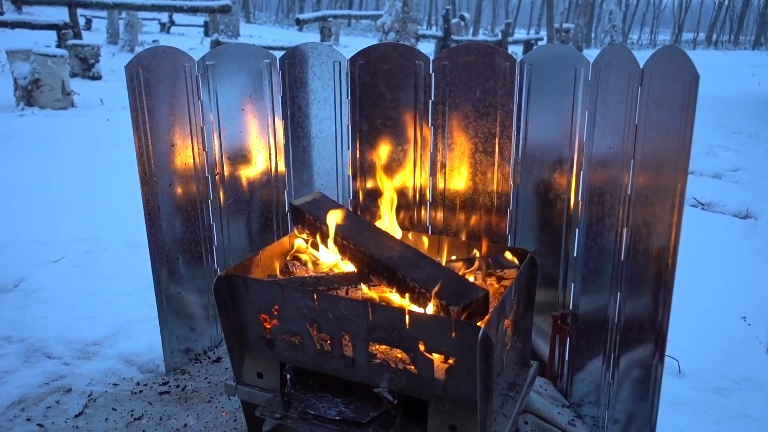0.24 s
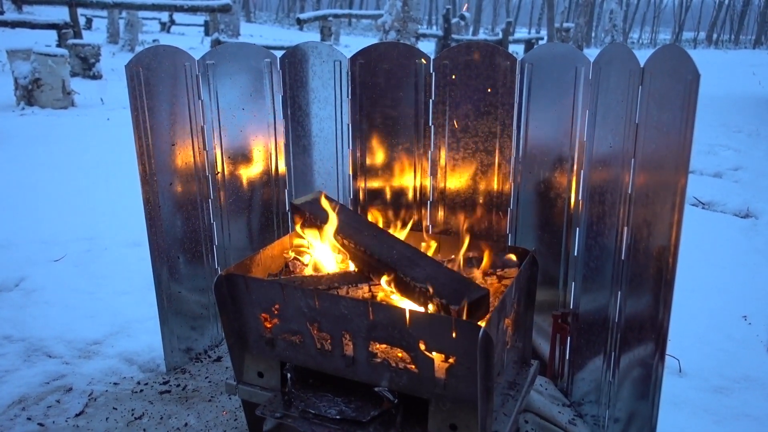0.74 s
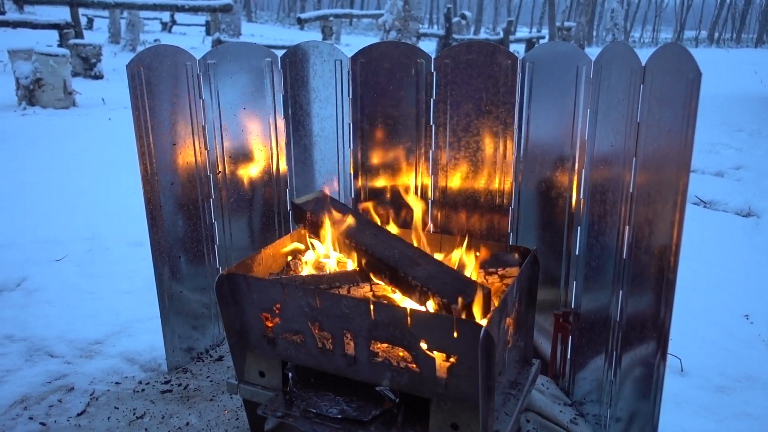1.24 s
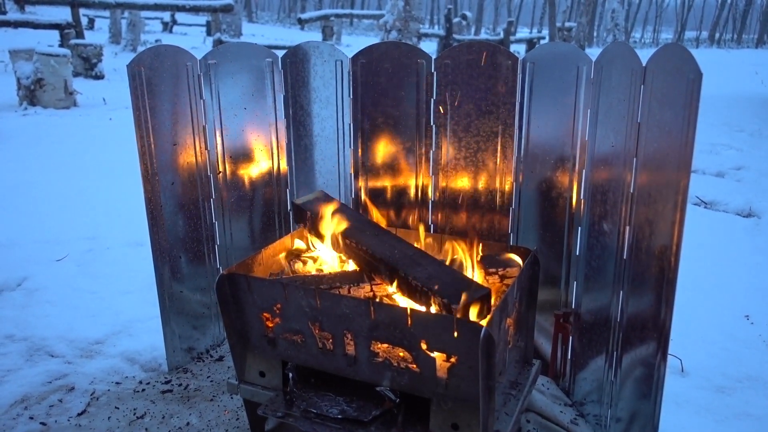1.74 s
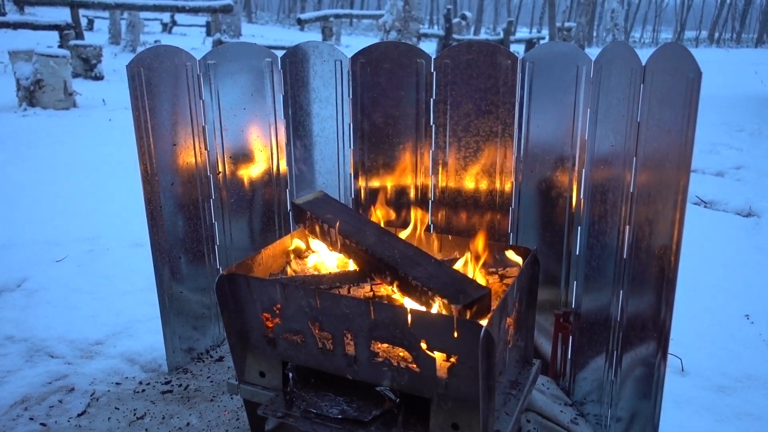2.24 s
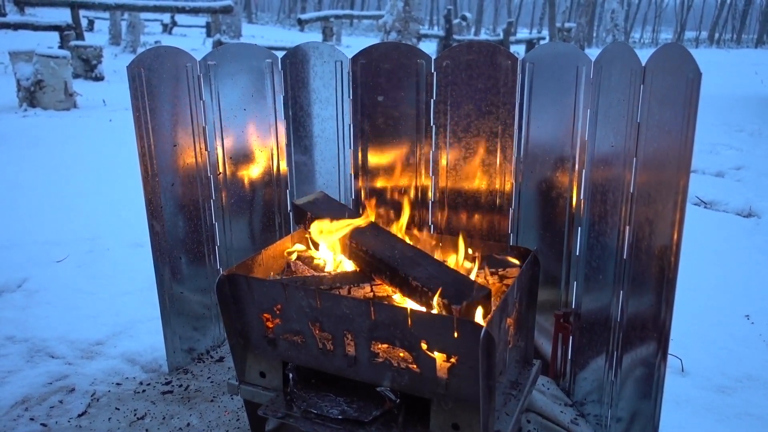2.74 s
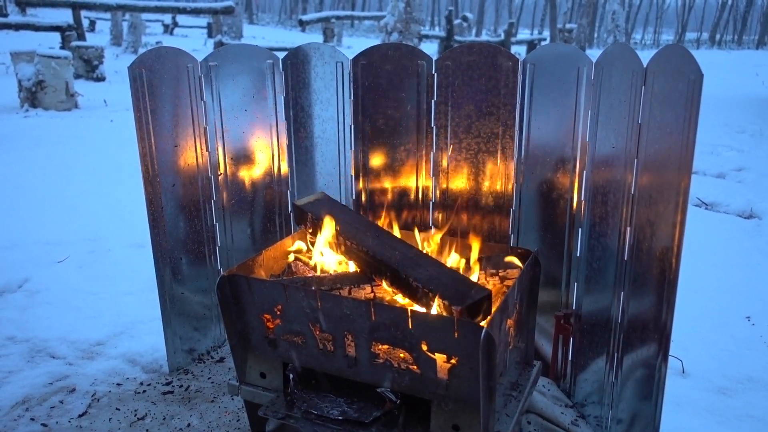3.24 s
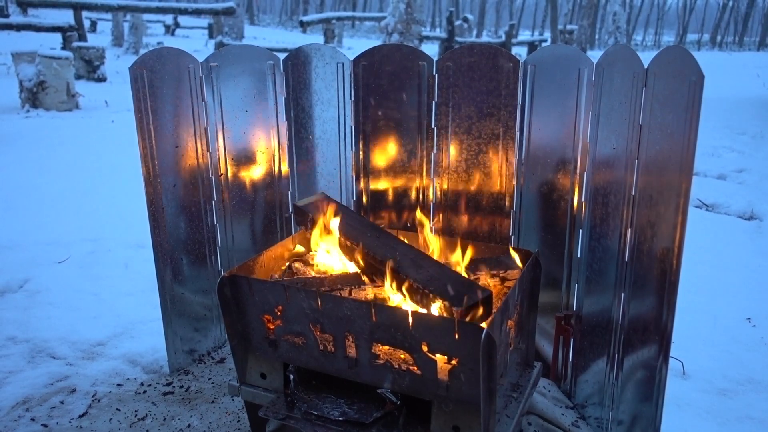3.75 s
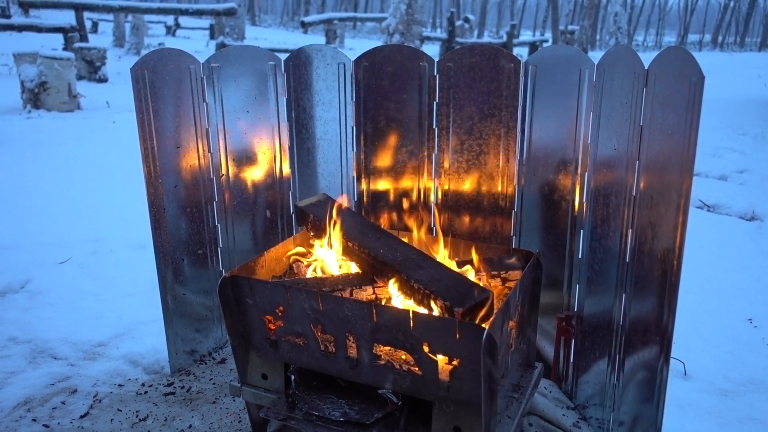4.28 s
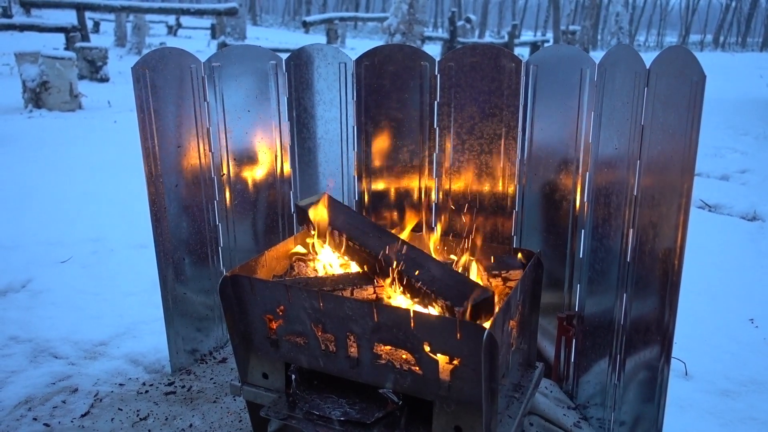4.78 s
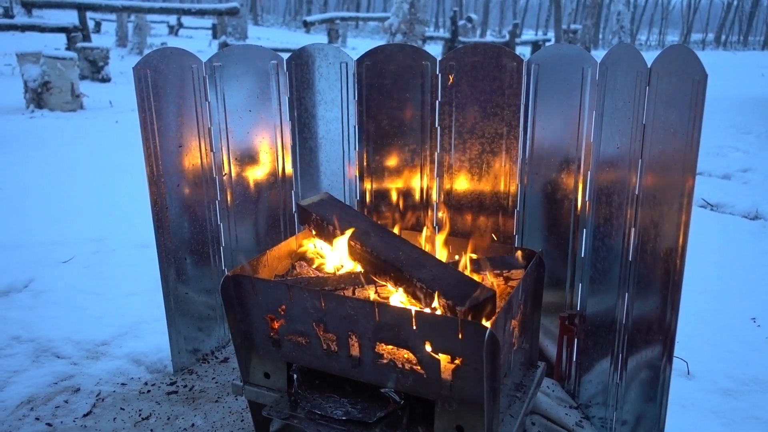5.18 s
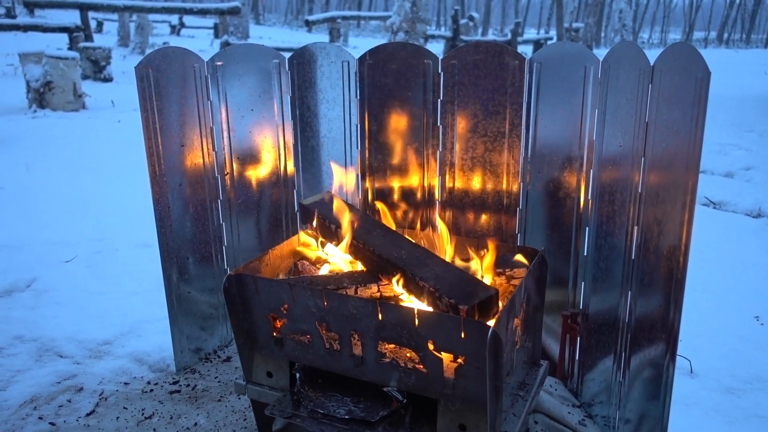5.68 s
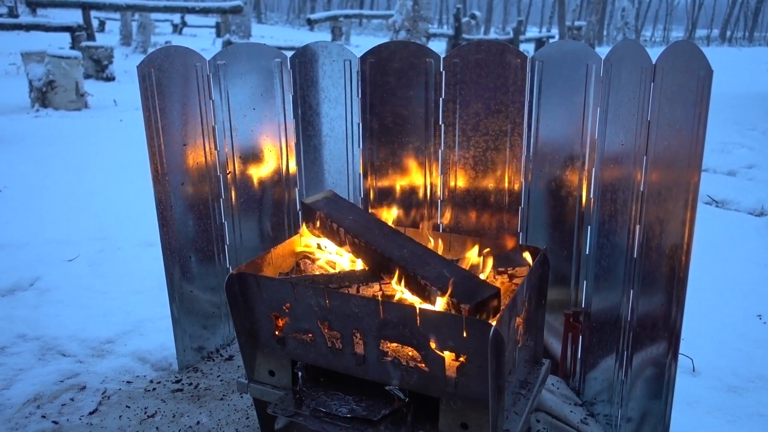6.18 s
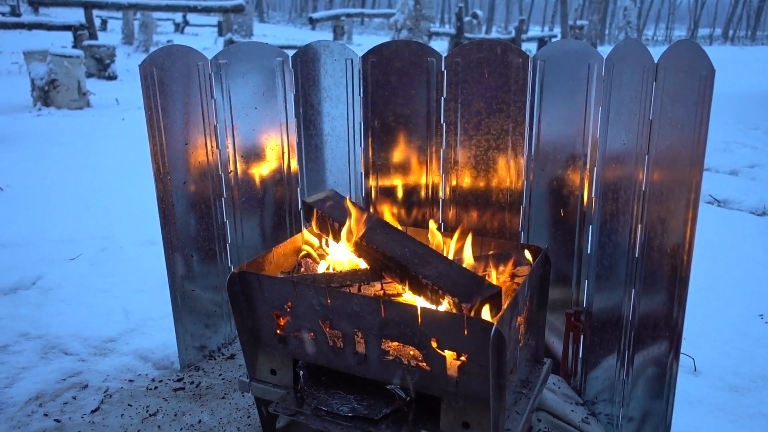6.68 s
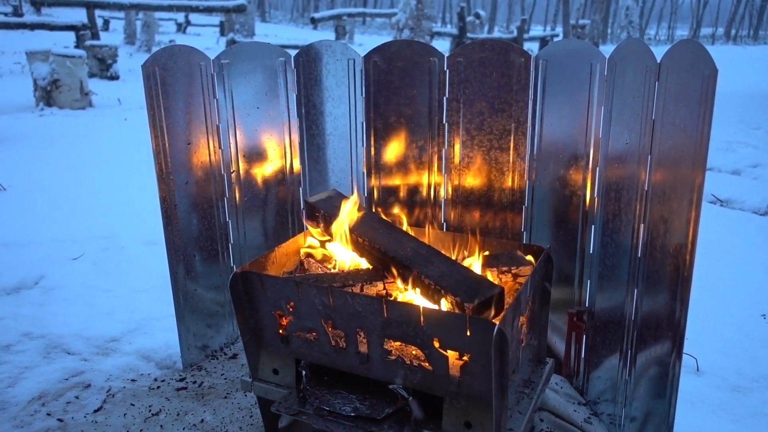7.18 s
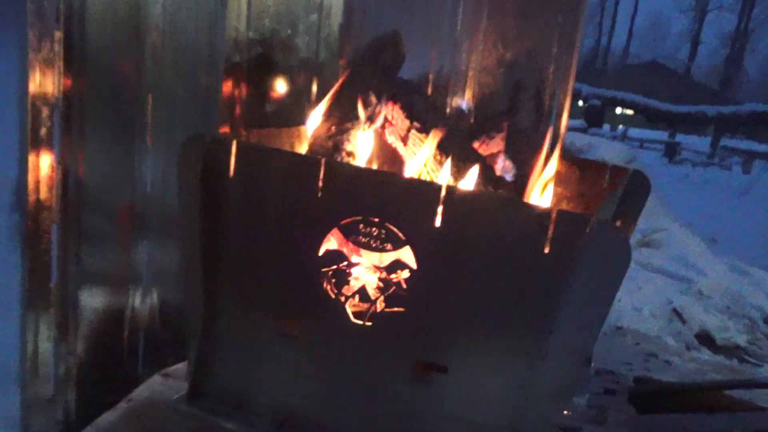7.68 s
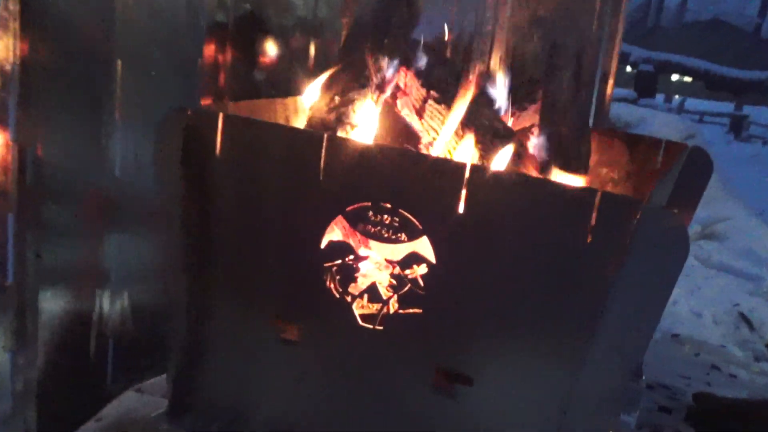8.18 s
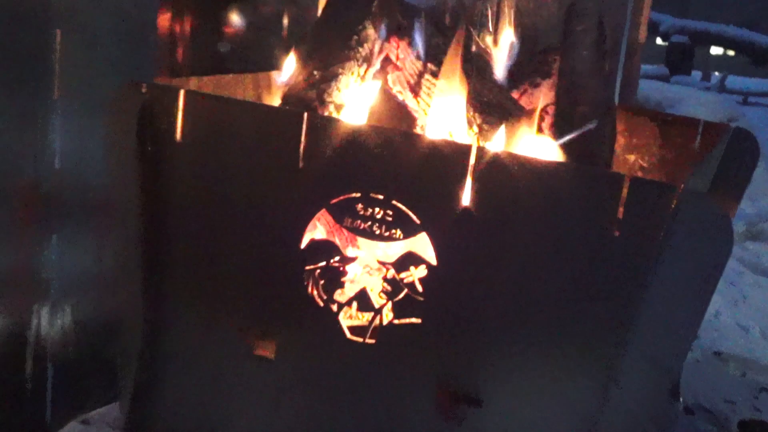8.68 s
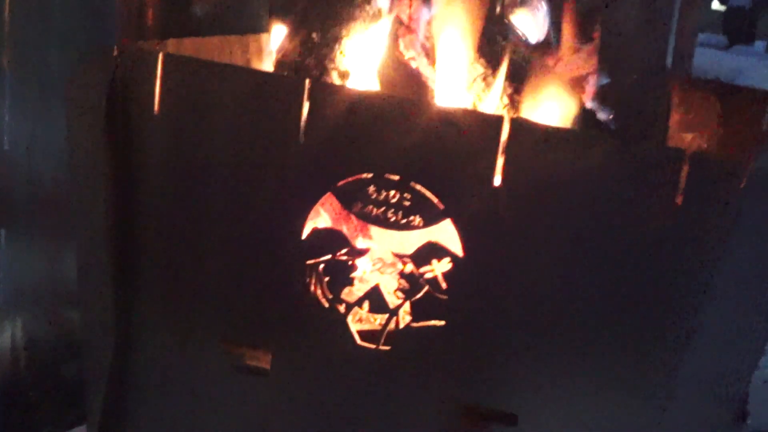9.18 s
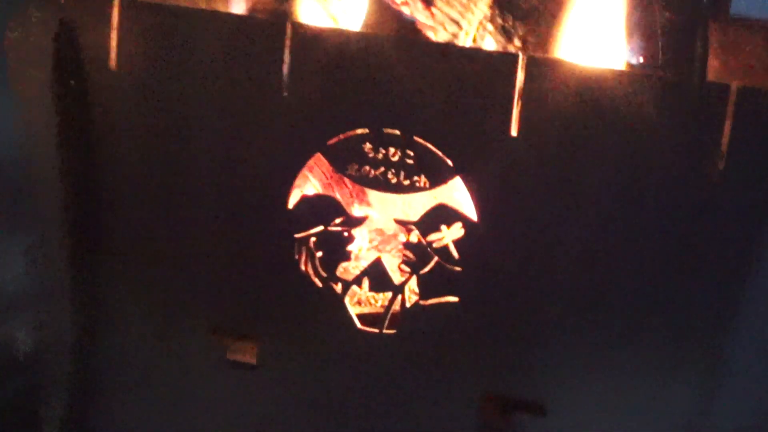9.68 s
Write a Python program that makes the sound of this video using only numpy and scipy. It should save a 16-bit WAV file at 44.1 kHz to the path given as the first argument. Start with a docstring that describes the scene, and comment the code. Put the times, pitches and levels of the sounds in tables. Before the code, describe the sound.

A crackling wood fire in a steel pit, first off to the left with brief metallic echoes, then close and centred with fuller flame noise.

```python
"""Firewood crackles in a steel fire pit: gas pockets burst in the wood as short, coloured impulses.
First the fire stands to the left, before a folding steel windscreen whose echoes follow each snap;
then it is close and straight ahead, with more sizzle and flame noise and a flaring jet of gas.
Flame, sap and steam are filtered noise with wandering level; logs knock and gas puffs as decaying
sines. A faint hum of slowly drifting sines lies underneath."""
import sys
import numpy as np
from scipy import signal
from scipy.fft import rfft, irfft
from scipy.io import wavfile
from scipy.ndimage import uniform_filter1d

SR = 44100
rng = np.random.default_rng(int(sys.argv[2]) if len(sys.argv) > 2 else 0)


def store_wav(level_fs):
    """Save 16-bit WAV to argv[1]."""
    pcm = np.round(np.clip(np.atleast_2d(level_fs), -1, 1) * 32767)
    wavfile.write(sys.argv[1], SR, pcm.T.astype(np.int16))


N = 437913
TIME = np.arange(N) / SR
MOVE_S = 7.74  # the listening place changes here
EDGE_HZ = 16100  # upper band limit
SIZE = 4096  # samples in one burst
BINS = np.fft.rfftfreq(SIZE, 1 / SR)
LEAD = 96  # samples before the spike of a snap
POCKET_DB = 7  # lift at the pitch of a gas pocket, before the burst is scaled to its energy


def amp(db):
    """Decibel law: level to amplitude gain."""
    return 10 ** (np.asarray(db) / 20)


def evened(x):
    """Power normalisation: scales to rms 1."""
    return x / np.sqrt(np.mean(x ** 2) + 1e-20)


def unit(x):
    """Energy normalisation: scales the sum of squares to 1."""
    return x / np.sqrt(np.sum(x ** 2) + 1e-20)


def read(points, hz):
    """Logarithmic frequency scale: interpolates a spectrum table at the given frequencies."""
    f, value = np.transpose(points)
    return np.interp(np.log(hz + 1), np.log(f + 1), value)


def gains(rows):
    """Level envelope: the dB columns of a time table as gains, sample by sample."""
    s, *columns = np.transpose(rows)
    return [amp(np.interp(TIME, s, column)) for column in columns]


def add(mix, s, sound):
    """Superposition: mixes a sound in at time s."""
    part = mix[:, max(round(s * SR), 0):][:, :sound.shape[-1]]
    part += sound[..., :part.shape[1]]


def causal(db):
    """Minimum phase: the spectrum of the most sudden pulse that has this colour."""
    mirrored_db = np.concatenate([db, db[-2:0:-1]])
    log_gain = np.log(amp(mirrored_db))
    return np.exp(np.conj(signal.hilbert(log_gain)))[:len(db)]


def wander(rate_hz):
    """Random modulation: Gaussian low-passed noise of rms 1."""
    lowpass = np.exp(-(np.fft.rfftfreq(N, 1 / SR) / rate_hz) ** 2)
    return evened(irfft(rfft(rng.standard_normal(N)) * lowpass, N))


# resonances and dips of the steel box and windscreen: pitch_hz, width_hz, level_db
STEEL_RESONANCES = [(720, 260, 4), (990, 145, -2.5), (1216, 163, 5), (1580, 170, 1), (1700, 420, 1.5),
                    (1970, 460, -1), (2430, 150, 3), (2780, 150, -4.5), (2900, 140, 4), (5700, 120, 2.5)]


def box_db(hz):
    """Resonance: the peaks and dips that the steel walls give to the fire."""
    return sum(db / (1 + (2 * (hz - f) / width) ** 2) for f, width, db in STEEL_RESONANCES)


# left minus right at the first place: pitch_hz, level_db
LEFTWARD = [(250, 0.5), (700, 2), (1300, 6.5), (3500, 6), (8000, 7.5), (15000, 10.5)]
# how far the left ear lags at the first place: pitch_hz, phase_rad
LEFT_LAG = [(50, 0.032), (200, 0.29), (450, 0.81), (1200, 1), (3000, 0.56), (7500, 0.52), (15000, 1)]


def sides(hz):
    """Interaural difference: left and right gains and phases for the fire off to the left, power kept."""
    ratio = amp(read(LEFTWARD, hz))
    left = ratio * np.exp(-1j * read(LEFT_LAG, hz))
    right = np.ones_like(ratio)
    return np.array([left, right]) / np.sqrt((1 + ratio ** 2) / 2)


# left-right likeness of the steady noise at the first place: pitch_hz, share
LIKENESS = [(60, 0.99), (130, 1), (290, 0.91), (700, 0.49), (1400, 0.13), (3000, 0.064), (15000, 0.11)]


def noise(colour, near, box_share=0.48, near_likeness=0.98, lean=0.9):
    """Interaural coherence: stereo noise of one colour, partly shared by the ears, near or far."""
    hz = np.fft.rfftfreq(N, 1 / SR)
    a, b = rfft(rng.standard_normal((2, N)))
    same = np.clip(near_likeness if near else read(LIKENESS, hz), 0, 1)
    spectrum = np.array([a, same * a + np.sqrt(1 - same ** 2) * b]) * amp(read(colour, hz))
    if not near:
        # lean and box_share weaken the sideways placing and the steel resonances
        spectrum = spectrum * sides(hz) ** lean * amp(box_share * box_db(hz))
    x = irfft(spectrum, N)
    return x / x.mean(0).std()


# colour of the flames at the first place: pitch_hz, level_db (relative, per Hz)
FAR_FLAME = [(20, -11), (38, -7.5), (65, -6.5), (98, -5), (211, -7), (361, -22.5), (497, -18), (747, -24),
             (900, -34), (1500, -52)]
# colour of the sizzle at the first place: pitch_hz, level_db (relative, per Hz)
FAR_SIZZLE = [(350, -30), (600, -6), (858, 0.5), (1640, 3), (2040, 0.5), (2470, 1.5), (5190, -3.5),
              (8740, -3), (14900, -2.5), (16000, -1.5)]
# sap boiling out of the logs, before the trims of hiss and crackle: start_s, level_db
FAR_SAP = [(0.0, -58.5), (1.03, -58.5), (1.26, -54.5), (1.72, -57.5), (3.04, -57), (3.62, -60.5),
           (3.99, -57), (4.42, -57.5), (4.95, -57), (5.75, -61), (6.22, -59.5), (7.7, -57.5)]
# hum at the first place: pitch_hz (before drift), level_db (rms)
FAR_HUM = [(26.9, -79), (53.8, -60.5)]


def far_fire(flame_db=-59.5, flutter_db=3.0, hiss_db=-1, flicker_db=1.23, tick_db=17, ticks_per_s=80):
    """Modulated noise: fluttering flames and sizzling sap at the first place, over drifting hum tones."""
    sap, = gains(FAR_SAP)
    flame = amp(flame_db + flutter_db * wander(31)) * noise(FAR_FLAME, False)
    hiss = amp(hiss_db + flicker_db * wander(69)) * noise(FAR_SIZZLE, False)
    crackle = amp(tick_db) * ticks(ticks_per_s, False, spread_db=6.5, bright_db=1.3)
    # drifting clock shared by both hum tones
    drifting_s = np.cumsum(1 + 0.0074 * wander(1.6)) / SR
    hum = sum(amp(db) * np.sqrt(2) * np.sin(2 * np.pi * hz * drifting_s) for hz, db in FAR_HUM)
    return flame + sap * (hiss + crackle) + hum


def ticks(per_s, near, spread_db, bright_db, pocket_db=11, ring_db=-3, count=32):
    """Poisson-like process: tiny bursts from pockets of many sizes, most faint and a few larger."""
    happens = rng.random(N) < per_s / SR
    size = amp(spread_db * np.minimum(rng.exponential(1, N), 3)) * happens
    when = np.flatnonzero(size)
    kinds = []
    for pocket_hz in np.geomspace(2000, 15000, count):
        tick_bright_db = bright_db + 1.3 * rng.standard_normal()
        kinds.append(snap(tick_bright_db, pocket_hz, pocket_db, ring_db, near))
    out = np.zeros((2, N))
    for i, kind in zip(when, rng.integers(0, count, N)[when]):
        add(out, i / SR, size[i] * kinds[kind])
    return out


def splinter_db(peak_db=6.5, width_hz=280):
    """Resonance: the splinter that breaks off sounds a brief woody note of its own."""
    hz = np.exp(rng.uniform(np.log(1100), np.log(6500)))
    return peak_db / (1 + (2 * (BINS - hz) / width_hz) ** 2)


def spot_in_pit(pan_db=0.6, skew_s=.00001):
    """Localisation: each burst's own place in the pit shifts level and time between the ears a little."""
    pan, skew = rng.standard_normal(2)
    right = amp(pan_db * pan) * np.exp(2j * np.pi * BINS * skew_s * skew)
    return sides(BINS) * np.array([np.ones(len(BINS)), right])


# echoes from the windscreen panels, before random scatter: delay_s, level_db
PANEL_ECHOES = [(.0016, -4.5), (.0032, -16.5), (.0043, -15), (.006, -29), (.0083, -15), (.0091, -20)]


def burst(ring_db, near, tear_s=0.00022, tear_db=0, ring_t60=0.032, tail_t60=0.16, tail_db=-14,
          far_apart=0.43, near_apart=0.032):
    """Impulse and reverberation: a spike, a brief tearing of fibres, then scatter between logs and steel."""
    t = np.arange(SIZE) / SR
    tear, scatter, tail, other, other_tail = rng.standard_normal((5, SIZE))
    shifts, strengths = rng.standard_normal((2, len(PANEL_ECHOES)))
    spike = t == 0
    crack = unit(spike + amp(tear_db) * unit(tear * np.exp(-t / tear_s)))

    opening = 1 - np.exp(-(t / 0.00023) ** 2)
    dying = opening * amp(-60 * t / ring_t60)
    lingering = opening * amp(-60 * t / tail_t60)
    ring = unit(scatter * dying) + amp(tail_db) * unit(tail * lingering)
    if not near:  # each spot in the fire has slightly different paths to the panels
        for (delay, db), shift, strength in zip(PANEL_ECHOES, shifts, strengths):
            echo = np.roll(crack, round((delay + .00015 * shift) * SR))
            ring = ring + amp(db + 4.2 * strength) * echo

    # part of the scatter differs between the ears
    apart = near_apart if near else far_apart
    spread = apart * (unit(other * dying) + 2 * amp(tail_db) * unit(other_tail * lingering))
    return rfft(crack + amp(ring_db) * (unit(ring) + np.array([spread, -spread])))


# mean colour of a snap: pitch_hz, level_db
CRACK_COLOUR = [(60, -40), (200, -16.5), (380, -28.5), (700, -17.5), (1000, -12), (2000, -9), (3200, -5),
                (6000, -4), (9000, -1.5), (13000, -3.5), (16000, -5)]
# treble colour at the second place, softest at the very top: pitch_hz, level_db
NEAR_TOP = [(5000, -1), (11000, 1), (16000, -5.5)]


def snap(bright_db, pocket_hz, pocket_db, ring_db, near, pocket_octaves=0.59):
    """Source and filter: one burst of energy 1, coloured by its gas pocket and, if far, by the steel."""
    spectrum = burst(ring_db, near)
    # the scatter gives only the fine ripple; the pocket sets the broad colour
    power = (abs(spectrum) ** 2).mean(0)
    broad_db = 10 * np.log10(uniform_filter1d(power, size=140) + 1e-9)
    octave = np.clip(np.log2((BINS + 1) / 4000), -2.5, 2)
    pocket = np.exp(-(np.log2((BINS + 1) / pocket_hz) / pocket_octaves) ** 2)
    colour_db = read(CRACK_COLOUR, BINS) + bright_db * octave + pocket_db * pocket
    colour_db = colour_db + splinter_db() - broad_db
    if near:
        spectrum = spectrum * causal(colour_db + read(NEAR_TOP, BINS))
    else:
        spectrum = spectrum * causal(colour_db + box_db(BINS)) * spot_in_pit()
    energy = np.mean(abs(spectrum) ** 2 * (BINS < EDGE_HZ))
    # the spike stands LEAD samples into the sound
    return np.roll(irfft(spectrum), LEAD, axis=1) / np.sqrt(energy)


# pockets of gas burst in the wood: start_s, level_db (energy, before the trim of its place),
# brightness_db_per_octave, pitch_hz (of the pocket), ring_db (against the first crack)
SNAPS = [(0.0782,1.5,1.5,800,-3.5), (0.2367,-10,-1,14000,6), (0.2632,-1,4,2800,-2.5), (0.37,4,-4,12490,3),
         (0.3885,-4.5,1.5,1420,11), (0.4455,2.5,-3.5,3050,0), (0.5142,-2,2,1780,-8),
         (0.5223,2.5,0,8800,-3.5), (0.739,-16,1.5,1130,-4), (0.8567,-5,3,4430,-10.5),
         (0.979,-9,-1,14100,-13), (1.0203,-5.5,-2,3560,-8), (1.0547,-10,-3,3540,-4),
         (1.1124,-5.5,-1.5,14100,0), (1.2597,-10.5,3,7900,-10), (1.2829,0,1,14000,-8),
         (1.3503,-17,-1.5,4460,-5), (1.368,-12,0,2540,-6), (1.3912,-8,-1,9300,-12), (1.4067,0.5,0,14000,-6),
         (1.4665,2,1.5,1030,-6), (1.5906,-9,-5.5,1150,3), (1.8081,-13,-4.5,5600,-9), (1.8595,-2.5,3,3970,5),
         (1.975,-14.5,0.5,3540,3), (2.2305,-2,3,1990,2), (2.2827,-5,0.5,14300,-3), (2.3049,-7,2,14100,0),
         (2.4894,-10.5,-0.5,9930,-8), (2.5161,-6.5,-1.5,14100,-5), (2.7025,4,2.5,2530,6),
         (2.7896,-15.5,2,14000,-13), (2.9263,-13.5,-2,1270,-3), (2.9365,-16,-1,11130,-13),
         (3.0453,-14,2,2820,1), (3.057,-6,0,14000,-11), (3.12,-10.5,-0.5,11130,-10),
         (3.1364,-6,-0.5,1990,-8), (3.3005,-17,2.5,2820,1), (3.3407,-9.5,-3,3030,-6.5),
         (3.4514,-2.5,-1,4940,-10), (3.6425,-14,-0.5,7900,1.5), (3.6937,-7.5,0.5,14000,-5),
         (3.8485,2.5,-2.5,2600,-0.5), (3.8747,-1.5,-1.5,8760,4), (3.9686,-12.5,1,9930,7),
         (4.0312,-3.5,2,8550,-11), (4.0503,-3,-3,3560,-1), (4.0756,-1.5,0.5,1980,-5),
         (4.1325,-12.5,-5,3300,0), (4.3062,-7.5,-1,9930,0), (4.3549,-13,-4,14000,18),
         (4.431,-7,-0.5,4400,-2), (4.6315,-6,-3.5,6000,2), (4.6844,0,2.5,1010,1), (4.757,5,0.5,11100,0),
         (4.772,1.5,4.5,1150,12), (5.0263,-15,1,14000,-4), (5.0941,-9,1,2820,-3), (5.1691,-9,-0.5,3540,-8),
         (5.197,1.5,2,1260,-3), (5.4111,-3.5,1.5,8000,-10), (5.427,-7,0.5,2240,3), (5.445,-12.5,1,3540,0),
         (5.515,-11.5,0.5,7540,-5), (5.7915,-16.5,-4,2280,8), (5.96,-1.5,6.5,12400,-3),
         (6.055,-2.5,-0.5,7040,-7), (6.1187,-15.5,-0.5,7900,-7), (6.1733,-1,3,10700,-5),
         (6.246,-13.5,3,1300,-1), (6.2555,-4,1,13000,-2), (6.3003,-5,-0.5,12000,2), (6.3557,-5.5,4,2230,-4),
         (6.513,-7.5,-4.5,13700,-3), (6.5634,-3.5,-1,11200,-4), (6.6498,-10.5,3,12490,-1),
         (6.7035,-6.5,2,850,-7), (6.7605,-5,1,2820,0), (6.9797,-14,-2.5,2820,0), (6.9998,-5.5,3,1130,-5),
         (7.239,-8,-3.5,8860,-4), (7.253,-10,-1,3160,5), (7.2748,-7,0,4460,-8), (7.3257,-11,-2.5,14300,-7),
         (7.4603,-15.5,-1,8860,2), (8.0247,-2,-0.5,2500,-4.5), (8.102,-12.5,5,7900,-12),
         (8.1473,-15,4,5600,-12), (8.195,8.5,-1,5740,-1), (8.203,6,-1,6600,-4), (8.531,-12,-0.5,14000,-6),
         (8.7918,-13.5,-1,9800,-4), (9.267,-11.5,-1,9000,14), (9.7234,-1,-4.5,11900,-4)]


def snaps(far_db=0.5, near_db=1.1):
    """Impulsive radiation: the snaps and pops that stand out, one burst for each pocket."""
    out = np.zeros((2, N))
    for s, db, bright_db, pocket_hz, ring_db in SNAPS:
        near = s > MOVE_S
        gain = amp(db + (near_db if near else far_db))
        add(out, s - LEAD / SR, gain * snap(bright_db, pocket_hz, POCKET_DB, ring_db, near))
    return out


def small_snaps(near, per_s, spread_db=1.2, bright_db=0, bright_spread_db=5.0, ring_db=-1, ring_spread_db=4):
    """Random impulses: smaller pockets burst by chance, each with its own size and colour."""
    out = np.zeros((2, N))
    when, pitch = rng.random((2, round(per_s * N / SR)))
    characters = rng.standard_normal((len(when), 3))
    for s, octaves, (size, bright, ring) in zip(when * N / SR, 2.4 * pitch, characters):
        pop_bright_db = bright_db + bright_spread_db * bright
        pop_ring_db = ring_db + ring_spread_db * ring
        sound = snap(pop_bright_db, 2800 * 2 ** octaves, POCKET_DB, pop_ring_db, near)
        add(out, s, amp(spread_db * size) * sound)
    return out


def cavity(hz, t60, rise_cycles=0.22):
    """Damped oscillation: a hollow rings for a few cycles."""
    t = np.arange(SIZE) / SR
    rise = 1 - np.exp(-t * hz / rise_cycles)
    return amp(-60 * t / t60) * rise * np.sin(2 * np.pi * hz * t)


# hollow knocks of wood in the pile, before the mode levels: start_s, level_db, pitch_hz,
# pan_db (left minus right)
KNOCKS = [(0.3702, -25.5, 720, 2), (1.5912, -27.5, 720, 5), (9.0607, -33, 830, 3.5),
          (9.7224, -18.5, 940, -3)]
# what a knocked log rings with: multiple (of its pitch), level_db (before hardness), t60_s
LOG_MODES = [(1, 1, 0.025), (1.82, -1.5, 0.017)]


def knocks(overtone_db_per_db=1.47, usual_db=-26):
    """Modal vibration: settling logs ring with the same modes at their own pitch, brighter when harder."""
    out = np.zeros((2, N))
    for s, db, hz, pan_db in KNOCKS:
        ears = amp(np.array([[pan_db], [-pan_db]]) / 2)
        for multiple, mode_db, t60 in LOG_MODES:
            # a harder knock rings the higher mode more
            hardness_db = overtone_db_per_db * (db - usual_db) * np.log2(multiple)
            add(out, s, ears * amp(db + mode_db + hardness_db) * cavity(hz * multiple, t60))
    return out


# trapped gas catches fire with a dull puff: start_s, level_db, pitch_hz
PUFFS = [(0.376, -24, 138), (1.4702, -42, 210), (1.5897, -31, 203), (4.632, -34, 198), (8.2052, -24, 208),
         (9.258, -32, 195), (9.647, -30.5, 181), (9.813, -27, 191)]


def puffs(t60_s=0.04):
    """Cavity resonance: gas ignites in the hollows between the logs."""
    out = np.zeros((2, N))
    for s, db, hz in PUFFS:
        add(out, s, amp(db) * cavity(hz, t60_s))
    return out


# steam spurts out of fresh cracks: start_s, level_db (before sputter), t60_s
SPURTS = [(0.385, -45, 0.34), (0.53, -45, 0.14), (1.53, -53, 0.48), (2.066, -35.5, 0.042),
          (2.705, -41.5, 0.3), (3.86, -38.5, 0.31), (4.775, -50, 0.32), (5.572, -48.5, 0.11),
          (6.785, -45, 0.27)]
# colour of the steam: pitch_hz, level_db
STEAM_COLOUR = [(300, -26), (1200, -12), (2500, -5.5), (4000, -2), (8000, -4), (16000, -4)]


def spurts(rise_s=.005, sputter_db=3.5):
    """Turbulent jet noise: steam hisses through a new crack, sputtering as its pressure falls."""
    pressure = np.zeros((1, N))
    t = np.arange(SR // 2) / SR
    for s, db, t60 in SPURTS:
        add(pressure, s, amp(db - 60 * t / t60) * (1 - np.exp(-t / rise_s)))
    sputter = amp(sputter_db * wander(250))
    return pressure * sputter * noise(STEAM_COLOUR, False, box_share=0.84, lean=0.86)


# colour of the flames at the second place: pitch_hz, level_db (relative, per Hz)
NEAR_FLAME = [(38, -45), (65, -11.5), (122, -2), (145, -4.5), (197, -6), (329, -15.5), (689, -17),
              (805, -15.5), (999, -20), (1340, -24.5), (1490, -23), (1770, -22.5), (2600, -41), (3380, -55),
              (5720, -120)]
# colour of the sizzle at the second place: pitch_hz, level_db (relative, per Hz)
NEAR_SIZZLE = [(1200, -25), (2000, -3.5), (3300, -3), (4900, -2), (5730, 1.5), (9200, -3), (12800, -7),
               (14500, -14), (16000, -24)]
# burning at the second place, before the trims of each layer: start_s, flame_level_db, sap_level_db
NEAR_BURN = [(7.78, -51, -55.5), (8.0, -50.5, -52), (8.87, -50, -54.5), (9.93, -49, -51.5)]
# a jet of burning gas flares up, before its flicker: start_s, level_db
JET = [(9.1, -72.5), (9.35, -55), (9.55, -47.5), (9.8, -47.5), (9.93, -60)]
# colour of the jet: pitch_hz, level_db
JET_COLOUR = [(300, -18), (650, -0.5), (1100, -10), (1700, -2), (2400, -9.5), (5000, -15), (12000, -18)]
# hum at the second place: start_s, fundamental_level_db (rms), octave_level_db (rms)
NEAR_HUM = [(7.74, -60, -64), (8.2, -59, -56), (8.45, -69, -59), (8.85, -72, -48), (8.95, -68, -48.5),
            (9.05, -59, -77), (9.93, -66, -73)]


def near_fire(flame_db=-1, flutter_db=0.7, hiss_db=-0.7, tick_db=13, ticks_per_s=130, hum_hz=60.5):
    """Modulated noise: flames and sap close by, with a flaring jet of gas and a higher hum."""
    burn, sap = gains(NEAR_BURN)
    flame = burn * amp(flame_db + flutter_db * wander(30)) * noise(NEAR_FLAME, True)
    flicker = amp(0.9 * wander(80))
    hiss = amp(hiss_db) * flicker * noise(NEAR_SIZZLE, True)
    crackle = amp(tick_db) * ticks(ticks_per_s, True, spread_db=7.0, bright_db=2.5)
    jet = gains(JET)[0] * amp(1.0 * wander(40)) * noise(JET_COLOUR, True)
    turns = np.cumsum(hum_hz * (1 + 0.0062 * wander(2.9))) / SR
    hum = sum(gain * np.sqrt(2) * np.sin(2 * np.pi * harmonic * turns)
              for harmonic, gain in enumerate(gains(NEAR_HUM), 1))
    return flame + sap * (hiss + crackle) + jet + hum


def scene(far_small_db=39, near_small_db=-17.0):
    """Equal-power crossfade: one place gives way to the other; the timed events are added on top."""
    moved = np.clip((TIME - MOVE_S) / .02 + .5, 0, 1)
    # the small snaps are louder while the sap boils harder
    far_small = gains(FAR_SAP)[0] * amp(far_small_db) * small_snaps(False, per_s=2.6)
    far = far_fire() + far_small
    close = near_fire() + amp(near_small_db) * small_snaps(True, per_s=2.5)
    steady = np.sqrt(1 - moved) * far + np.sqrt(moved) * close
    return steady + snaps() + spurts() + knocks() + puffs()


def record(dry, ceiling=0.7):
    """Soft saturation: the loudest spikes are rounded off; then a low-pass sets the band limit."""
    rounded = ceiling * np.tanh(dry / ceiling)
    lowpass = signal.firwin(301, EDGE_HZ, window=("kaiser", 8), fs=SR)
    return signal.oaconvolve(rounded, lowpass[None], "same")


dry = scene()
out = record(dry)
store_wav(out)
```